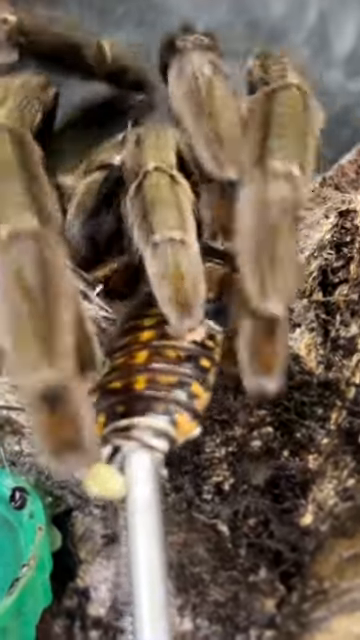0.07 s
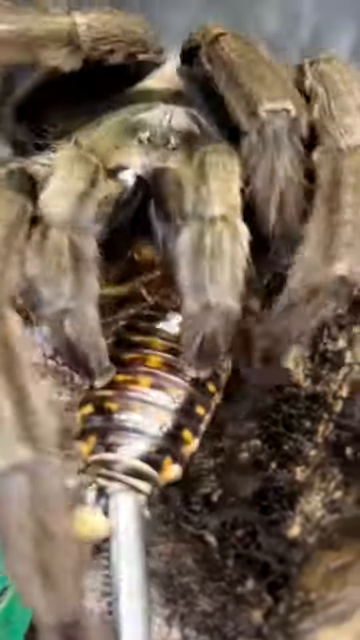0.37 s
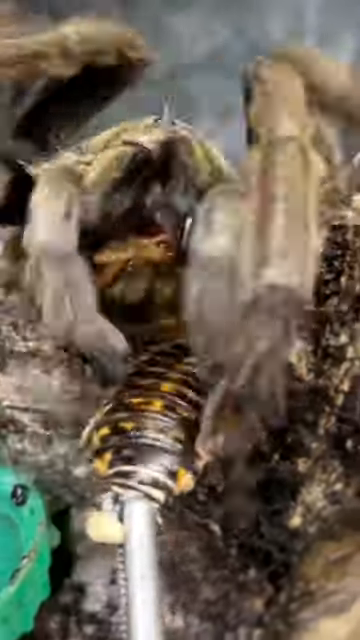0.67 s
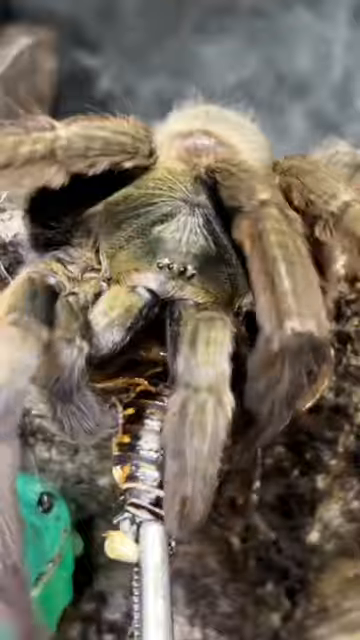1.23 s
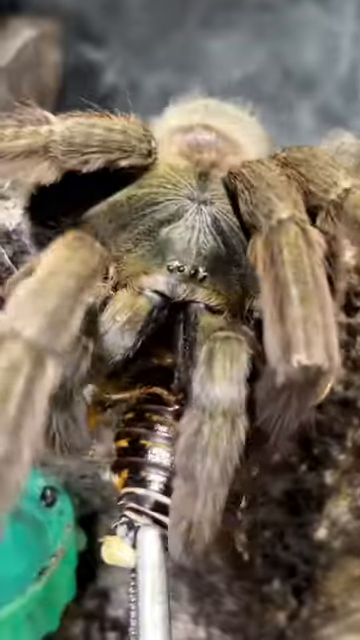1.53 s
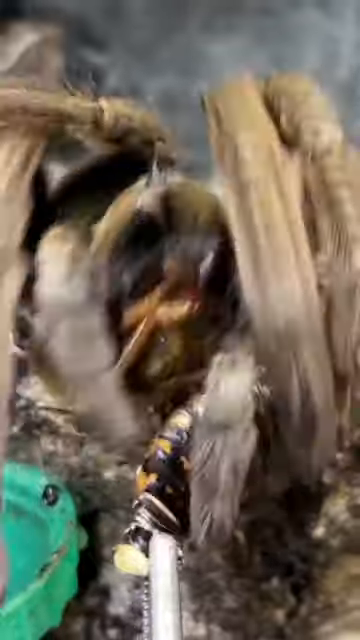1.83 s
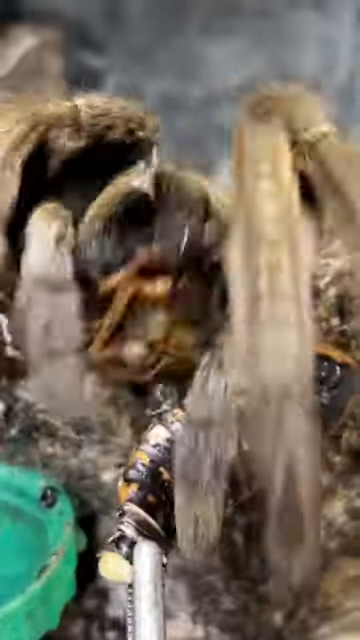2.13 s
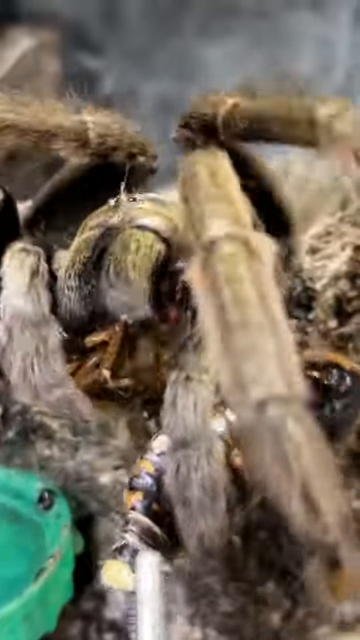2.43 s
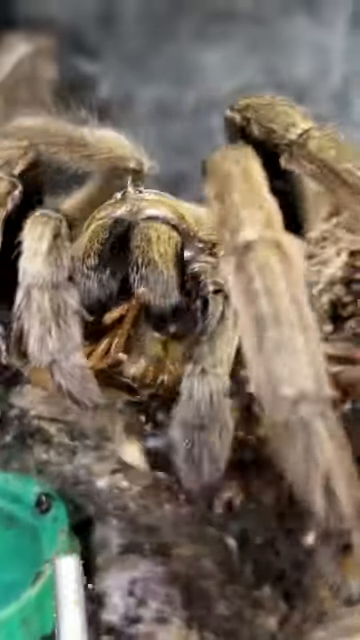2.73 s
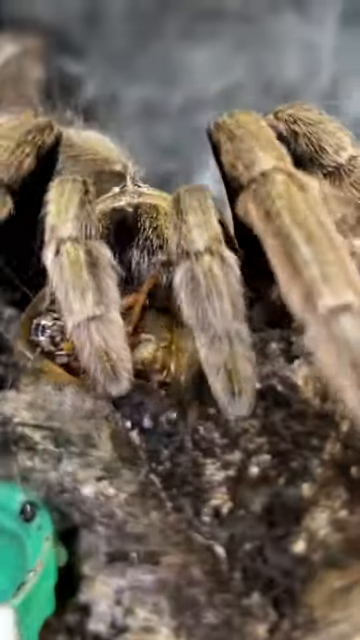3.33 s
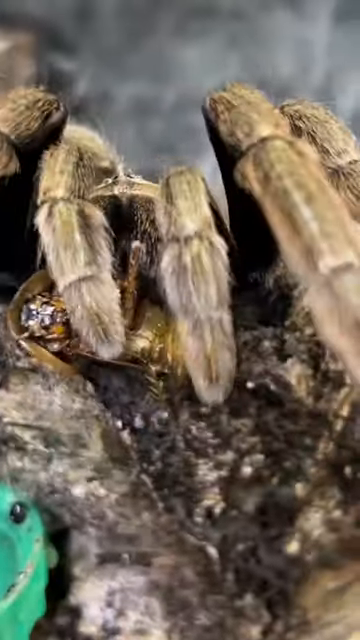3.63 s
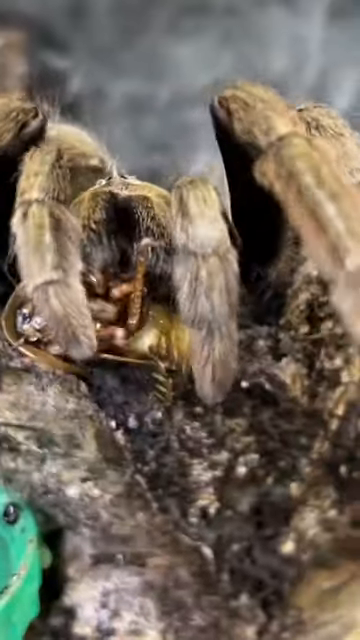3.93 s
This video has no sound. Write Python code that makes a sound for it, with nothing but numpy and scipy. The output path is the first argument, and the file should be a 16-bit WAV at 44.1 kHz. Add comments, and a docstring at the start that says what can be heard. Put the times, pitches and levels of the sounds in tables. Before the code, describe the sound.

Close snaps, scuffs and soft bumps as a spider grabs a roach, a cricket chirping faintly.

```python
"""Tarantula taking a roach, close up

Right at the microphone, a tarantula wrestles a roach off steel tongs on cork bark. Claws and shell
snap, legs brush and knock on the bark, the tongs tink, and the shoved tank booms softly.
Across the room a cricket rasps its wings, over a low appliance hum and a faint hiss."""
import sys
import numpy as np
from scipy import signal
from scipy.fft import rfft, irfft, next_fast_len
from scipy.io import wavfile
from scipy.ndimage import uniform_filter1d, map_coordinates

SR = 44100
rng = np.random.default_rng(int(sys.argv[2]) if len(sys.argv) > 2 else 0)


def inscribe(sig):
    """Save sig as 16-bit PCM at rate SR to the path in sys.argv[1].

    A 1-D sig is mono; a 2-D sig holds one channel per row.
    Samples are clipped to [-1, 1] before scaling.
    """
    pcm = np.round(np.clip(np.atleast_2d(sig).T, -1, 1) * 32767)
    wavfile.write(sys.argv[1], SR, pcm.astype(np.int16))


N = 176400

# reverberation of the room (frequency [Hz], t60 [s])
ROOM_DECAY = [(200, 0.94), (3000, 0.36), (7000, 0.16), (16000, 0.0092)]
# room tone at the microphone (frequency [Hz], left-right correlation)
ROOM_CORRELATION = [(100, 0.81), (400, 0.61), (700, 0.11), (2000, -0.25), (4000, 0.84), (8000, -0.68),
                    (13000, 0.35)]
# close sound at the two microphone ports (frequency [Hz], lead of left [rad])
PORT_PHASE = [(100, 0), (450, -.2), (1450, 1.8), (1950, 5.2), (3000, 7.1), (6500, 12.3), (8000, 11.9),
              (9000, 10), (10800, 9.2), (13000, 6.4), (14400, 5.9), (16000, 3.6)]
# its balance between the ports (frequency [Hz], left over right [dB])
PORT_BALANCE = [(200, -2.5), (550, -0.5), (1200, -4), (2100, 4.5), (5000, 8), (9000, 2), (14000, -0.5)]

# course of the appliance rumble (time [s], level [dB])
RUMBLE_LEVEL = [(0, -55), (.9, -52.5), (1.5, -57.5), (1.95, -55.5), (2.1, -61), (3.0, -59), (3.4, -55),
                (4, -62)]
# its colour (frequency [Hz], relative level [dB])
RUMBLE_SPECTRUM = [(32, -18), (46, 5.5), (56, 2), (67, 2), (78, 0), (110, -10), (145, -16), (200, -16),
                   (300, -59)]
# faint hiss (frequency [Hz], relative level [dB])
HISS_SPECTRUM = [(130, 8.5), (230, -2.5), (300, -9.5), (600, -20.5), (1200, -25.5), (2000, -23.5),
                 (3200, -35), (4600, -33), (6500, -28), (8500, -24.5), (10000, -47), (12500, -19.5),
                 (15000, -30.5), (16500, -40)]
# a low tone that swells, sinks and fades (time [s], level [dB], pitch [Hz])
THROB = [(.9, -84, 69), (1.049, -48.5, 68), (1.45, -51.5, 67.38), (1.78, -53, 63.05), (1.93, -50.5, 61.2),
         (2.05, -85, 58)]

# cricket across the room (time [s], relative level [dB])
CHIRPS = [(0.153, -61), (0.587, -65), (1.057, -64.5), (1.496, -63), (1.923, -63.5), (2.377, -63.5),
          (2.811, -61.5), (3.325, -62), (3.723, -62)]
# the four wing strokes of a chirp (relative level [dB])
STROKE_DB = [-5, 2, 1.5, 0.5]
# response of the wing (frequency [Hz], gain [dB])
WING_RESPONSE = [(5100, -5.5), (5600, -2), (5870, -8.5), (6060, 7), (6400, -6.5)]

# effort of the scuffle (time [s], relative level [dB])
EFFORT = [(0, -66), (.4, -67), (.49, -73), (.56, -68), (.66, -75), (.76, -71.5), (1.0, -68), (1.2, -83),
          (1.28, -83), (1.38, -76), (1.48, -84), (1.68, -81), (1.85, -80), (2.05, -83), (2.55, -86.5),
          (3.0, -82.5), (3.35, -85), (3.65, -88), (4, -75)]
# legs dragged over the bark (time [s], length [s], hair level [dB], cork level [dB])
DRAGS = [(0.468, 0.085, -71, -66), (0.6, 0.041, -51.5, -48.5), (0.635, 0.087, -56, -58),
         (0.925, 0.065, -68.5, -72), (1.127, 0.11, -62.5, -72), (1.699, 0.1, -67.5, -72),
         (1.799, 0.085, -61.5, -69), (2.147, 0.081, -71, -76), (2.613, 0.13, -70.5, -76),
         (3.224, 0.098, -75, -76)]
# brushing leg hairs (frequency [Hz], relative level [dB])
HAIR_SPECTRUM = [(1800, -18), (3200, -0.5), (4300, -3.5), (5800, -9), (6700, -4.5), (8400, -2), (9300, -5),
                 (10200, -1), (11800, 1), (13300, 0), (15500, -5), (16500, -2.5)]
# scuffed cork (frequency [Hz], relative level [dB])
CORK_SPECTRUM = [(250, 1), (420, -4.5), (800, -21.5), (1100, -15.5), (1700, -7), (2400, -33), (3200, -13.5),
                 (5000, -35)]

# shoves against the tank (time [s], boom level [dB], ring level [dB])
SHOVES = [(0.094, -54, -48.5), (0.215, -43, -41), (.238, -43, -42.5), (.296, -41, -39.5), (.338, -67, -38),
          (0.559, -51, -49.5), (.607, -42, -51), (.632, -40.5, -46), (0.691, -45.5, -50), (.94, -60, -47.5),
          (1.166, -55, -65), (1.814, -52.5, -59), (1.865, -52.5, -55), (2.993, -59.5, -56.5),
          (3.239, -71, -54.5), (3.61, -53, -57)]
# low modes of the tank (frequency [Hz], relative level [dB], t60 [s])
BOOM_MODES = [(90.4, -4.5, 0.14), (179.1, 1.5, 0.29)]
# its upper modes (frequency [Hz], relative level [dB], t60 [s])
RING_MODES = [(310, -9, 0.07), (408, -3, 0.07), (445, -5, 0.13)]
# bark rubbing as it shifts (frequency [Hz], relative level [dB])
RUB_SPECTRUM = [(150, 1), (250, -1), (450, -9.5), (650, -1.5), (1100, -15), (2000, -13), (5000, -48)]

# footfalls (time [s], level [dB], pitch [Hz], relative scratch level [dB], left over right [dB])
KNOCKS = [(0.0467, -48.5, 3000, -4.5, -4), (0.0931, -35.5, 3400, -12.5, -4.5), (0.0922, -40, 1580, -28, 4),
          (0.1865, -58.5, 3120, 3, 3.5), (.2962, -50.5, 1110, -3.5, 2), (0.3339, -44.5, 1150, -11, -4),
          (.339, -41.5, 1100, -24, 9), (0.377, -47.5, 3270, -15, 0), (0.5886, -51, 2730, 5, 2.5),
          (0.592, -50, 1160, -7, 5), (0.6889, -37, 1800, -15, -5), (0.6883, -41, 1125, -6, -11.5),
          (0.6907, -37.5, 630, -35, 12.5), (0.9462, -57, 1070, -5.5, 5), (1.324, -54, 3220, -15, 0),
          (1.819, -58, 1070, 0.5, 3.5), (1.948, -48, 602, -42, 1.5), (2.993, -58, 615, -14.5, 0),
          (3.108, -60, 1120, -4, -6.5)]
BARK_CYCLES = 13
# modes of the bark (pitch ratio, relative level [dB], t60 [cycles of the pitch])
BARK_MODES = [(1, 3.5, BARK_CYCLES), (1.33, -16, BARK_CYCLES), (1.9, -15, BARK_CYCLES / 2)]
# scratch of a landing foot (frequency [Hz], relative level [dB])
SCRATCH_SPECTRUM = [(300, -4.5), (1500, 4), (3400, 0.5), (4500, 1.5), (7000, -14.5), (10000, -16),
                    (16000, -6)]

# a fang or claw ticks on the tongs (time [s], level [dB])
TINKS = [(0.517, -42), (0.608, -37.5), (1.1672, -37)]
STEEL_T60 = 0.018
# modes of the tongs (frequency [Hz], relative level [dB], t60 [s])
STEEL_MODES = [(6740, -6, STEEL_T60), (7380, -3, STEEL_T60), (8080, 0, STEEL_T60), (8477, -7, STEEL_T60)]

# snaps of claw and shell (time [s], relative level [dB], tilt [dB/octave], t60 [s])
SNAPS = [(0.1848, -39, -2, 0.0073), (.392, -50, 17, .015), (0.45, -47.5, -1.5, 0.043),
         (0.507, -40, 19, 0.018), (0.5165, -35, 1.5, 0.013), (0.52, -32.5, 0, 0.018),
         (.561, -36.5, 0, 0.0088), (0.6069, -20.5, 5.5, 0.0068), (0.618, -38.5, -3, 0.015),
         (0.826, -52.5, -3.5, 0.053), (0.852, -48.5, -1, 0.027), (.969, -42, -1, 0.0046),
         (1.0104, -46, -4, 0.036), (1.137, -48, 2, 0.016), (1.1453, -42, -2, 0.0091),
         (1.1683, -32.5, -0.5, 0.0082), (1.4758, -50, 15, 0.011), (1.4898, -44.5, -1, 0.013),
         (1.7507, -46.5, -1, 0.04), (1.7923, -47.5, 1, 0.022), (1.8165, -52, -9, 0.016),
         (2.091, -49.5, -1, 0.0089), (2.4707, -51.5, 3, 0.012), (2.6301, -28.5, 7.5, 0.012),
         (3.119, -51, 7, 0.02), (3.255, -39.5, 2, 0.015), (3.3523, -42.5, 19, 0.021),
         (3.44, -49, 18, 0.0087), (3.483, -41, 7.5, 0.022)]
# cracking shell (frequency [Hz], relative level [dB])
SHELL_SPECTRUM = [(400, -33.5), (800, -15), (2000, -18), (3400, -3.5), (4500, -5), (5900, -11.5),
                  (6700, -5.5), (8100, -2.5), (9100, -1.5), (10000, 0), (11900, 1), (12900, -2.5),
                  (16500, -10.5)]


def amp(db):
    """Decibels to gain."""
    return 10 ** (np.asarray(db) / 20)


def pan(db):
    """Left and right gains, the left louder by db."""
    return amp(db * np.array([[0.5], [-0.5]]))


def unit(x):
    """Scale to rms 1."""
    return x / np.sqrt(np.mean(x ** 2) + 1e-20)


def along(points, hz):
    """Read (frequency, value) points on a log axis."""
    freqs, values = np.transpose(points)
    return np.interp(np.log(hz + 1), np.log(freqs + 1), values)


def curve(rows):
    """(time, value) rows to one value per sample."""
    return np.interp(np.arange(N) / SR, *np.transpose(rows))


def wobble(rate):
    """A smooth random curve, rate knots a second."""
    knots = rng.standard_normal(int(N * rate / SR) + 4)
    return map_coordinates(knots, [np.arange(N) * rate / SR])


def filtered(x, response):
    """Filter x by a complex function of frequency."""
    size = next_fast_len(N + SR // 2)
    hz = np.fft.rfftfreq(size, 1 / SR)
    return irfft(rfft(x, size) * response(hz), size)[..., :N]


def colour(x, spectrum, tilt_db=0, size=1024):
    """Causal filter of unit energy with the given spectrum, tilted per octave."""
    hz = np.fft.rfftfreq(size, 1 / SR)
    octaves = np.log2(np.maximum(hz, spectrum[0][0]))
    cepstrum = irfft(np.log(amp(along(spectrum, hz) + tilt_db * octaves)))
    cepstrum[1:size // 2] *= 2  # fold to minimum phase
    cepstrum[size // 2 + 1:] = 0
    kernel = irfft(np.exp(rfft(cepstrum)))
    return signal.fftconvolve(x, kernel / np.linalg.norm(kernel))[:len(x)]


def add(track, start_s, sound):
    """Mix a sound into a track at a time."""
    i = max(0, round(start_s * SR))
    track[..., i:i + sound.shape[-1]] += sound[..., :max(0, N - i)]


def fade(t, t60):
    """Exponential decay, 60 dB down at t60."""
    return np.exp(-np.log(1000) * t / t60)


def ring(modes, t):
    """Damped modes, their levels a little different at each blow."""
    return sum(amp(db + rng.normal(0, 1)) * fade(t, t60) * np.sin(2 * np.pi * hz * t)
               for hz, db, t60 in modes)


def crackle(ticks_per_s, friction):
    """Tiny impulses of random size on a bed of friction noise."""
    ticks = (rng.random(N) < ticks_per_s / SR) * rng.standard_normal(N)
    return unit(unit(ticks) + friction * rng.standard_normal(N))


def near(x):
    """A close sound reaches the two microphone ports out of step and at unequal levels."""
    lag = np.array([[0], [-1]])
    return filtered(x, lambda hz: np.exp(1j * lag * along(PORT_PHASE, hz)) * pan(along(PORT_BALANCE, hz)))


def room(x):
    """Stereo reverberation of the room; the treble dies first."""
    hz, t, noise = signal.stft(rng.standard_normal((2, SR // 2)), SR, nperseg=256)
    decay = fade(t, along(ROOM_DECAY, hz)[:, None])
    tail = signal.istft(noise * decay, SR, nperseg=256)[1]
    return signal.fftconvolve(x[None], tail / np.linalg.norm(tail[0]), axes=1)[:, :N]


def diffuse_noise(spectrum):
    """Coloured noise from all round the microphone, partly shared by left and right."""
    def mid_side(hz):
        angle = np.arccos(along(ROOM_CORRELATION, hz)) / 2
        return amp(along(spectrum, hz)) * [np.cos(angle), np.sin(angle)]

    mid, side = filtered(rng.standard_normal((2, N)), mid_side)
    return np.array([mid + side, mid - side]) / np.std(mid)


def room_tone(hum_hz=100.34, waver_db=2, drift_rad=0.099, whine_hz=8657):
    """Behind everything: appliance hum and rumble, a passing throb, hiss and a thin steady whine."""
    t = np.arange(N) / SR
    hum_level = amp(-51 + waver_db * wobble(5.03))
    hum = hum_level * np.sin(2 * np.pi * hum_hz * t + drift_rad * wobble(9.3))
    times, db, hz = np.transpose(THROB)
    throb_phase = 2 * np.pi * np.cumsum(np.interp(t, times, hz)) / SR
    throb = amp(np.interp(t, times, db)) * np.sin(throb_phase)
    whine = amp(-82) * np.sin(2 * np.pi * whine_hz * t)
    rumble = amp(curve(RUMBLE_LEVEL)) * diffuse_noise(RUMBLE_SPECTRUM)
    hiss = amp(-62) * diffuse_noise(HISS_SPECTRUM)
    return (hum + throb + rumble) * pan(-0.8) + whine + hiss


def cricket(direct_db, wet_db, stroke_s=0.028, spacing_s=0.037, start_hz=6104, fall_hz=976):
    """Across the room, each wing stroke is a rasp that falls through the wing's two resonances."""
    out, t = np.zeros(N), np.arange(SR // 16) / SR
    progress = np.minimum(t / stroke_s, 1)
    envelope = np.abs(np.sin(np.pi * progress)) ** 0.5
    for start, db in CHIRPS:
        for k, stroke_db in enumerate(STROKE_DB):
            roughness = 0.5 * unit(uniform_filter1d(rng.standard_normal(len(t)), size=60))
            hz = start_hz + rng.normal(0, 22) - fall_hz * progress ** 1.45
            rasp = np.sin(2 * np.pi * np.cumsum(hz) / SR + roughness)
            add(out, start + k * spacing_s, amp(db + stroke_db) * envelope * rasp)
    out = filtered(out, lambda hz: amp(along(WING_RESPONSE, hz)))
    return amp(direct_db) * out + amp(wet_db) * room(out)


def leg_rustle(wet_db, brush_db=4, flutter_db=2.2):
    """Close up, hairs brush and feet scuff the cork with the effort; each dragged leg adds a swell."""
    swells = np.zeros((2, N))
    for start, length, hair_db, cork_db in DRAGS:
        progress = np.arange(int(length * SR)) / (length * SR)
        add(swells, start, amp([[hair_db], [cork_db]]) * np.sin(np.pi * np.sqrt(progress)))
    effort = amp(curve(EFFORT) + np.array([[brush_db], [0]]))
    hair_level, cork_level = (effort + swells) * amp(flutter_db * wobble(70))
    hairs = unit(colour(crackle(ticks_per_s=420, friction=0.7), HAIR_SPECTRUM))
    cork_band = [(120, -46), *CORK_SPECTRUM, (8000, -81)]
    scuffs = crackle(ticks_per_s=150, friction=0.35)
    cork = unit(filtered(scuffs, lambda hz: amp(along(cork_band, hz))))
    out = hair_level * hairs + cork_level * cork
    return near(out) + amp(wet_db) * room(out)


def tank_shoves(rise_s=0.0057, rub_db=-13, rub_t60=0.17):
    """The struggle pushes the bark against the tank: it rubs, and the tank booms."""
    out, t = np.zeros(N), np.arange(SR // 3) / SR
    attack = 1 - np.exp(-t / rise_s)
    for start, boom_db, ring_db in SHOVES:
        rub = amp(rub_db) * colour(rng.standard_normal(len(t)), RUB_SPECTRUM) * fade(t, rub_t60)
        boom = amp(boom_db) * ring(BOOM_MODES, t)
        upper = amp(ring_db) * (ring(RING_MODES, t) + rub)
        add(out, start, (boom + upper) * attack)
    return near(out)


def bark_knocks(wet_db, scratch_t60=0.034):
    """A foot strikes the bark: a dead ring, shorter the higher it is, and a brief scratch."""
    out, t = np.zeros((2, N)), np.arange(SR // 10) / SR
    for start, db, hz, scratch_db, pan_db in KNOCKS:
        scratch = colour(rng.standard_normal(len(t)) * fade(t, scratch_t60), SCRATCH_SPECTRUM)
        knock = ring(BARK_MODES, t * hz) + amp(scratch_db) * scratch
        add(out, start, amp(db) * pan(pan_db) * knock)
    return near(out) + amp(wet_db) * room(out.mean(0))


def tong_tinks(wet_db):
    """Struck by a fang or claw, the gripped steel tongs give a bright, quickly damped tink."""
    out, t = np.zeros(N), np.arange(SR // 20) / SR
    for start, db in TINKS:
        add(out, start, amp(db) * ring(STEEL_MODES, t))
    return near(out) + amp(wet_db) * room(out)


def shell_snaps(wet_db, gain_db=-2.5, rise_s=0.0008):
    """Right at the microphone, claws slip and the shell gives: one sharp crack, then brief splintering."""
    out, t = np.zeros(N), np.arange(SR // 12) / SR
    crack = 0.6 * (np.arange(len(t)) == round(rise_s * SR))
    attack = np.minimum(t / rise_s, 1) ** 2
    for start, db, tilt_db, t60 in SNAPS:
        decay = fade(t, t60)
        splinters = rng.standard_normal(len(t)) * decay * attack
        snap = splinters / np.linalg.norm(splinters) + crack
        snap *= np.linalg.norm(decay) / np.linalg.norm(snap)  # longer snaps carry more energy
        add(out, start, amp(db + gain_db) * colour(snap, SHELL_SPECTRUM, tilt_db))
    return near(out) + amp(wet_db) * room(out)


def scene():
    """The struggle close to the microphone, the cricket and the room behind."""
    struggle = shell_snaps(wet_db=-21) + tong_tinks(wet_db=-21) + bark_knocks(wet_db=-24.5)
    struggle += tank_shoves() + leg_rustle(wet_db=-14)
    return struggle + cricket(direct_db=-4.5, wet_db=-0.5) + room_tone()


def record(dry):
    """The recorder cuts the deepest bass and keeps nothing above its band limit."""
    low_cut_hz, top_hz = 38, 16500
    return filtered(dry, lambda hz: (hz < top_hz) * (1 - 1 / (1 + (hz / low_cut_hz) ** 10)))


dry = scene()
out = record(dry)
inscribe(out)
```